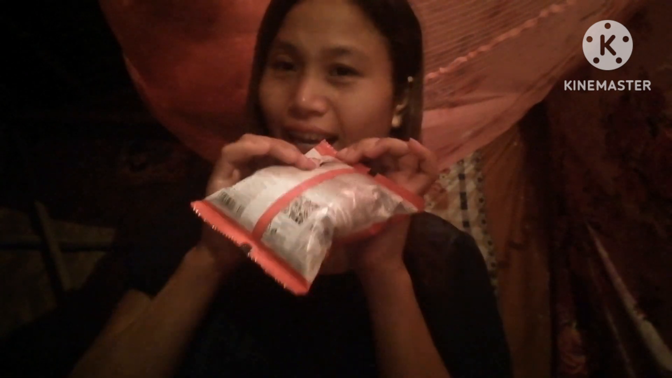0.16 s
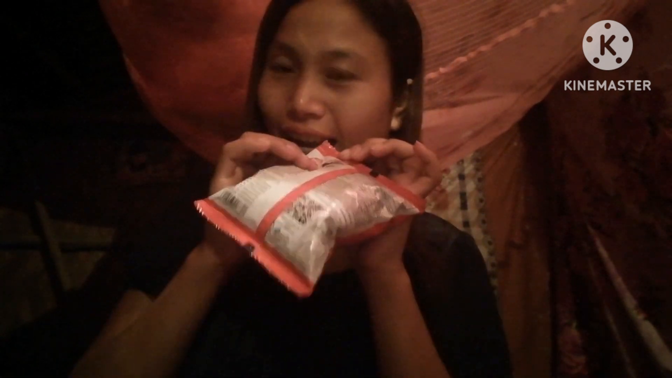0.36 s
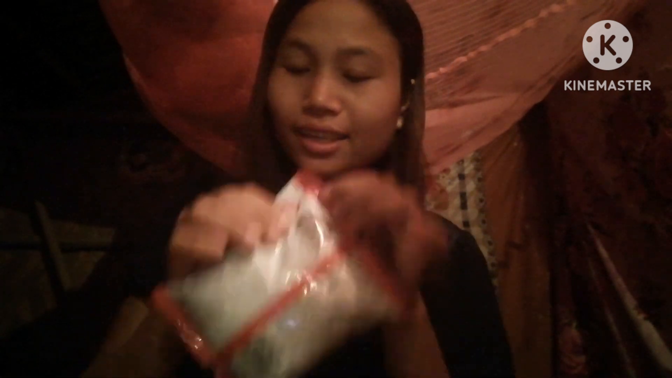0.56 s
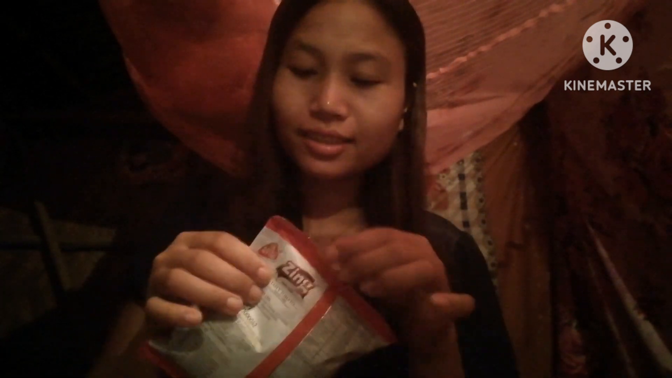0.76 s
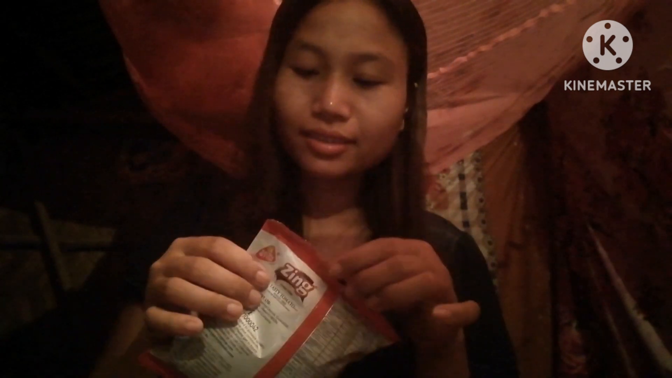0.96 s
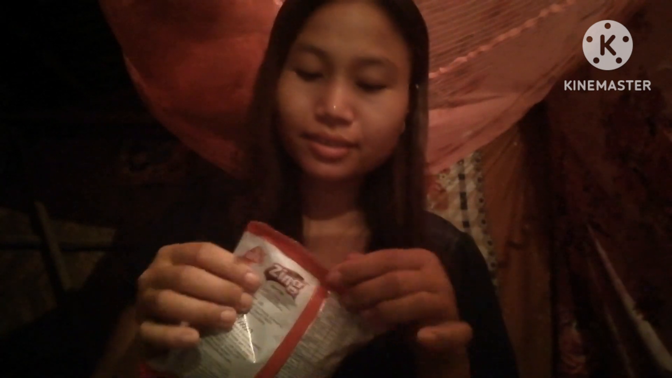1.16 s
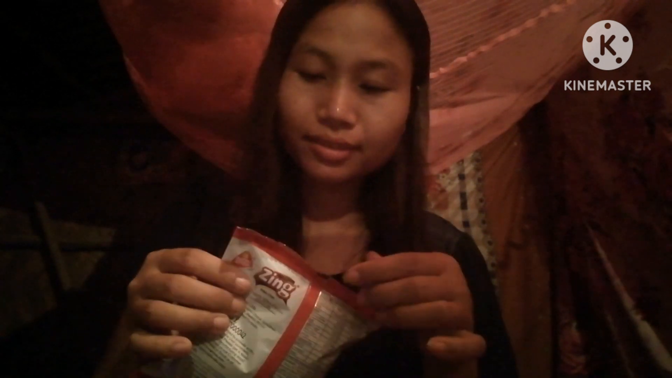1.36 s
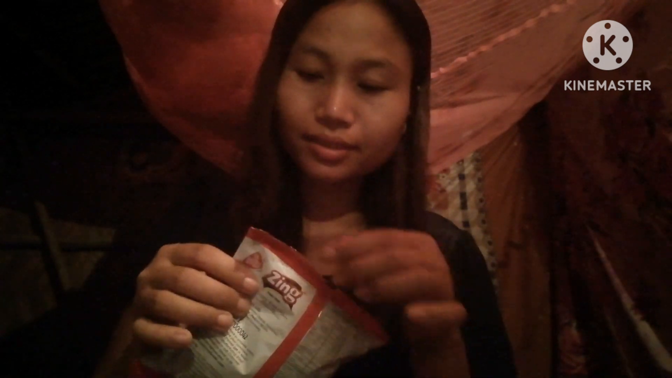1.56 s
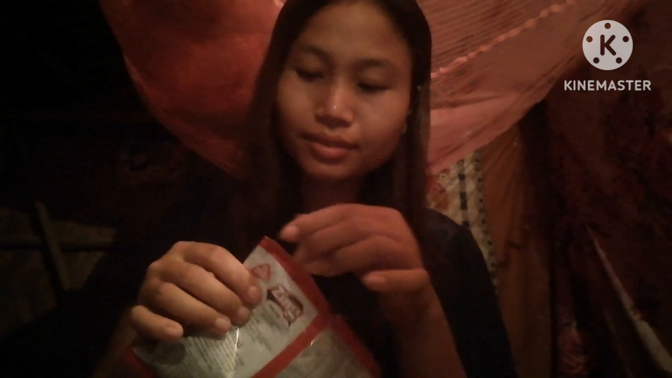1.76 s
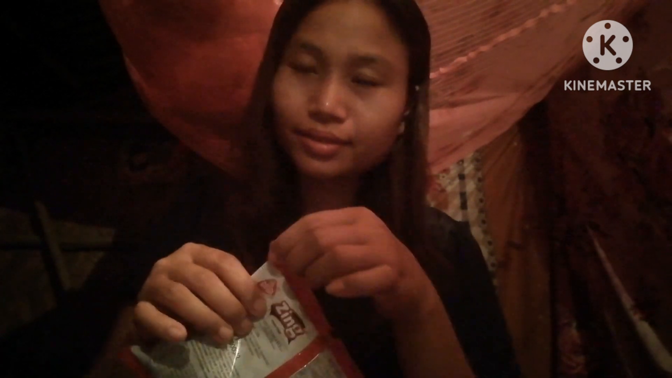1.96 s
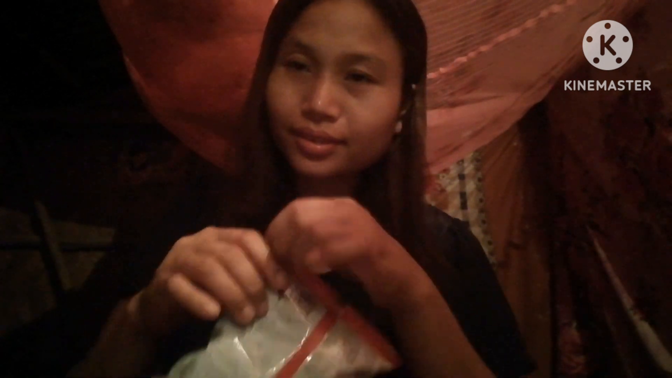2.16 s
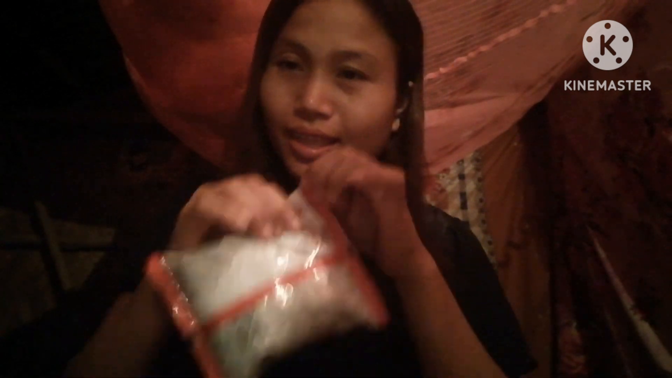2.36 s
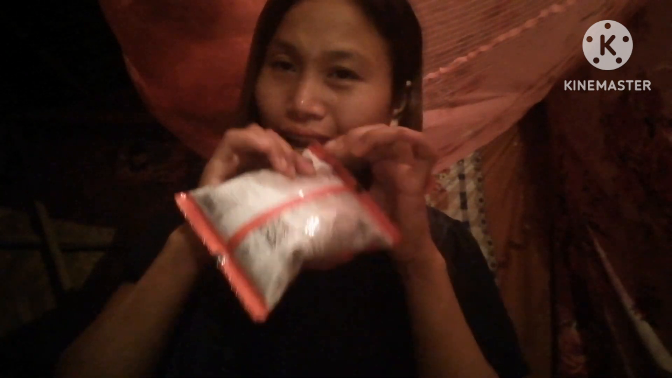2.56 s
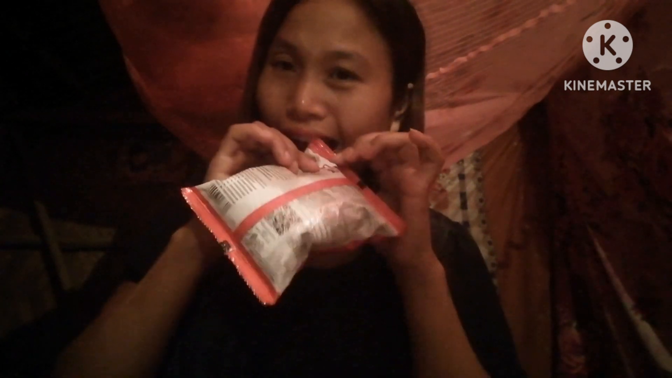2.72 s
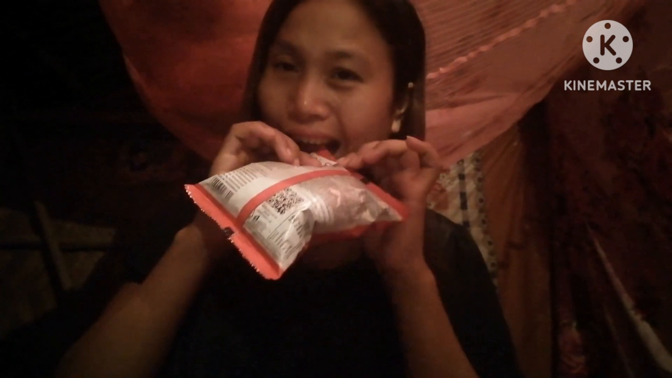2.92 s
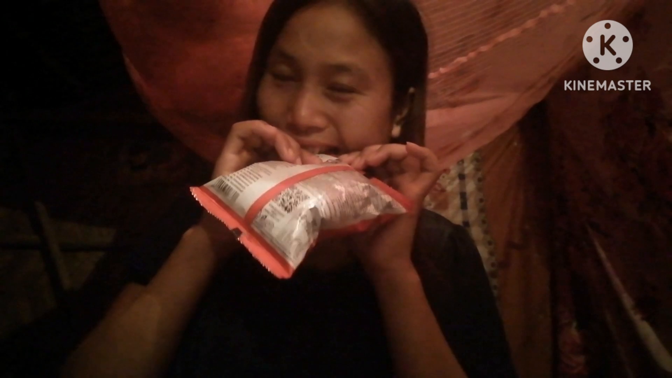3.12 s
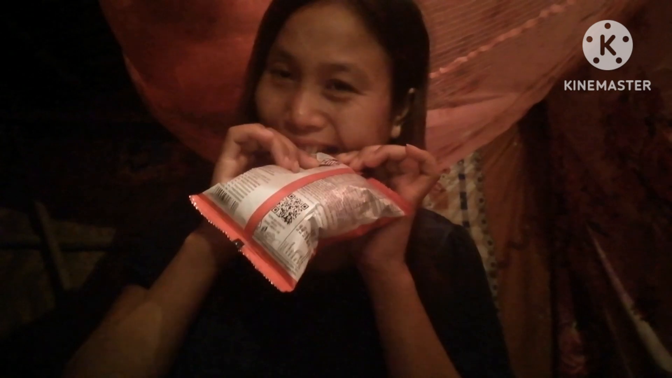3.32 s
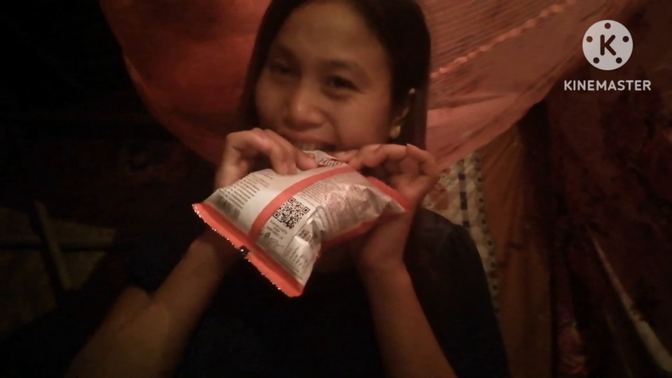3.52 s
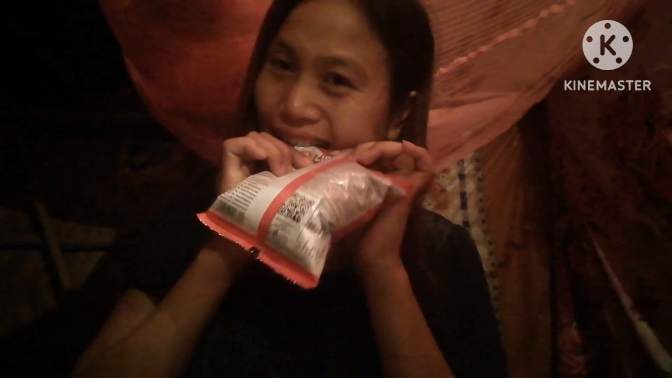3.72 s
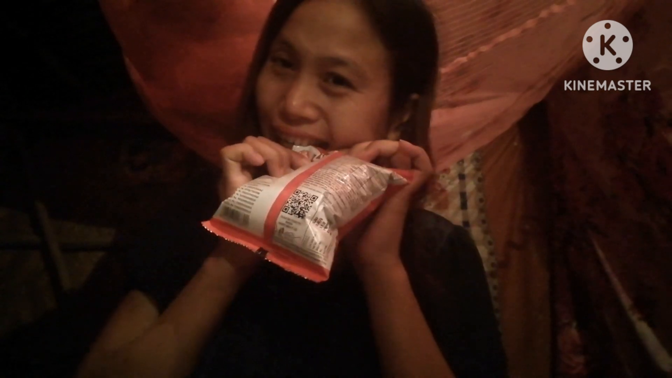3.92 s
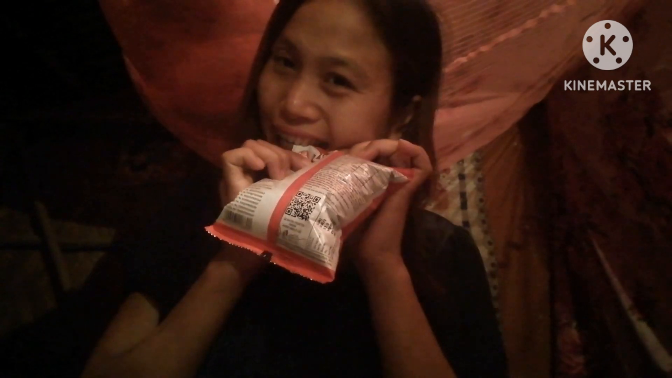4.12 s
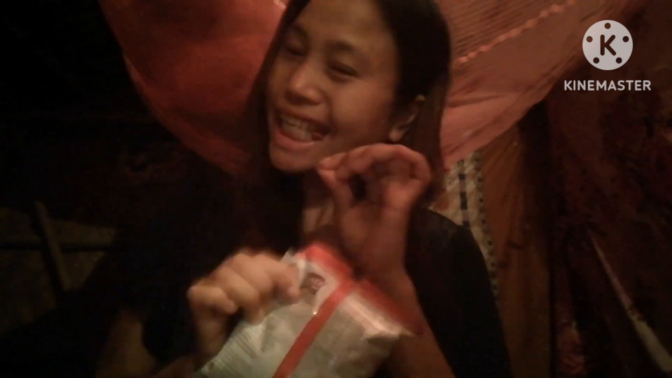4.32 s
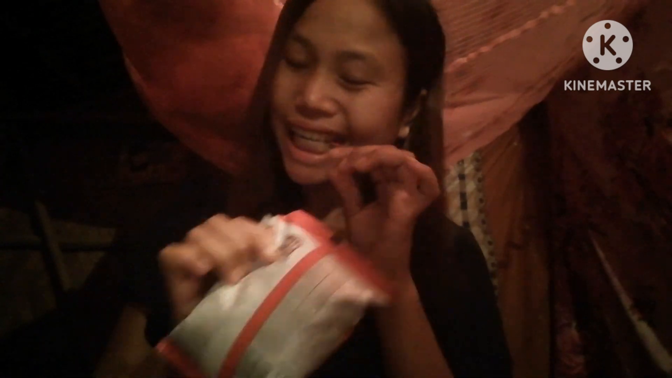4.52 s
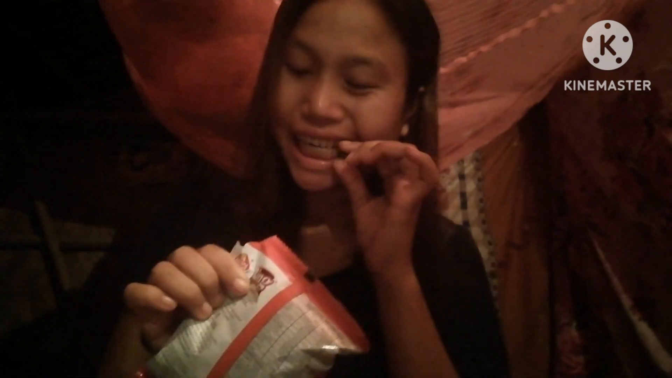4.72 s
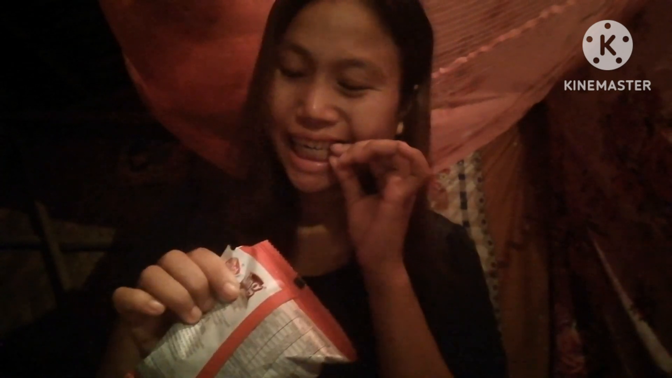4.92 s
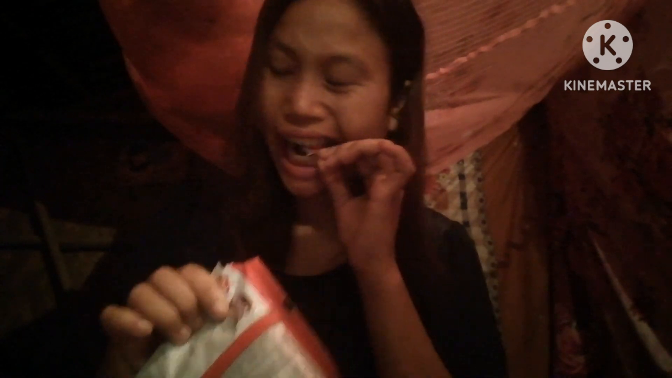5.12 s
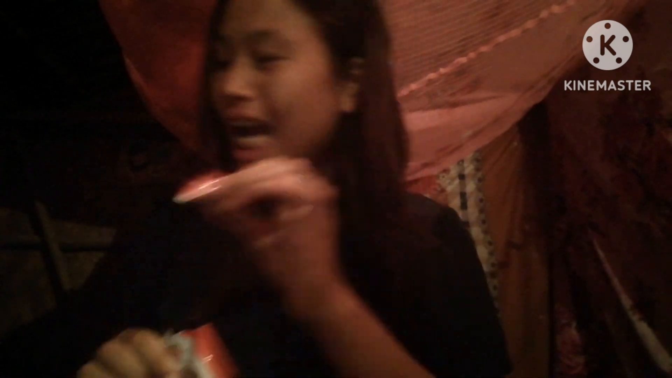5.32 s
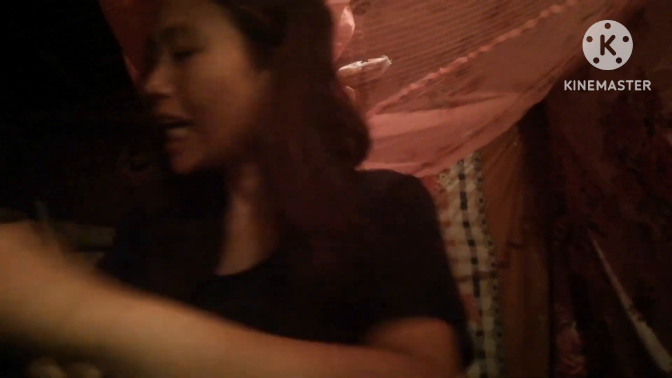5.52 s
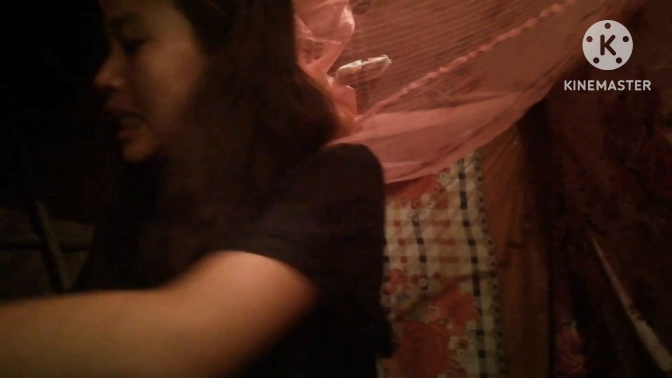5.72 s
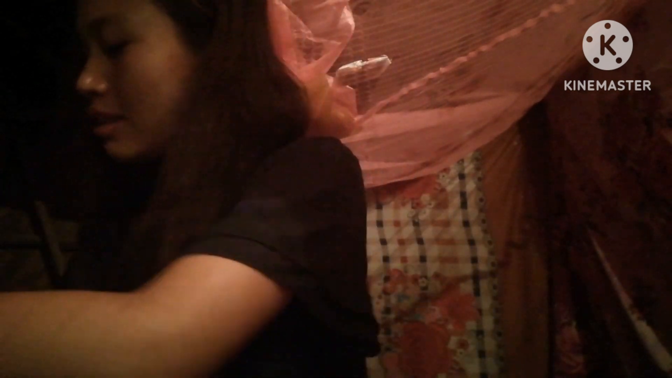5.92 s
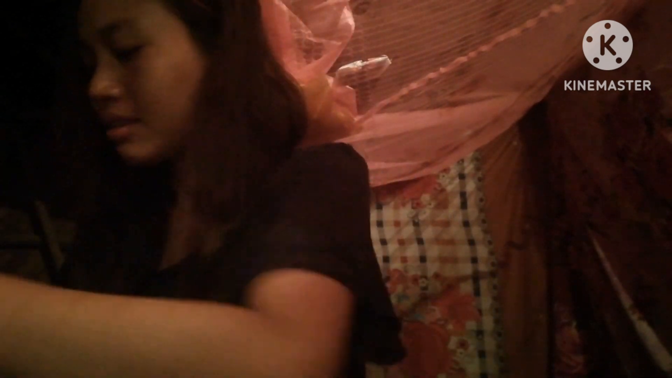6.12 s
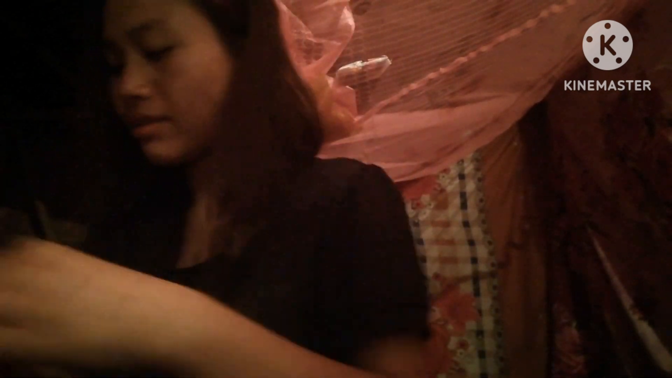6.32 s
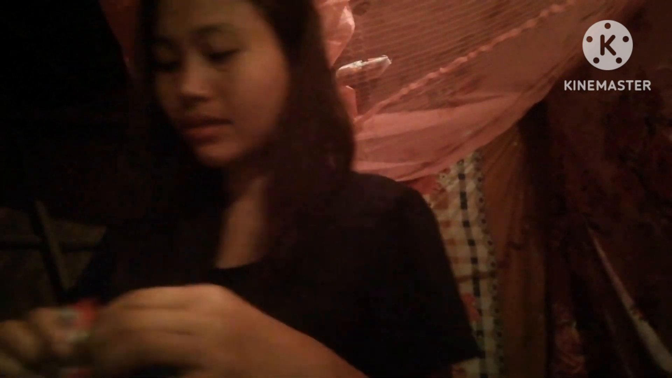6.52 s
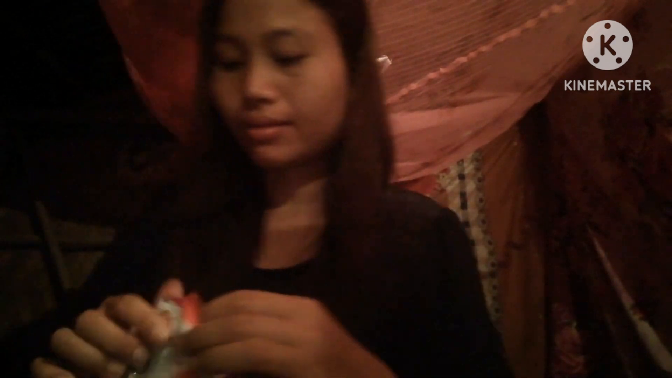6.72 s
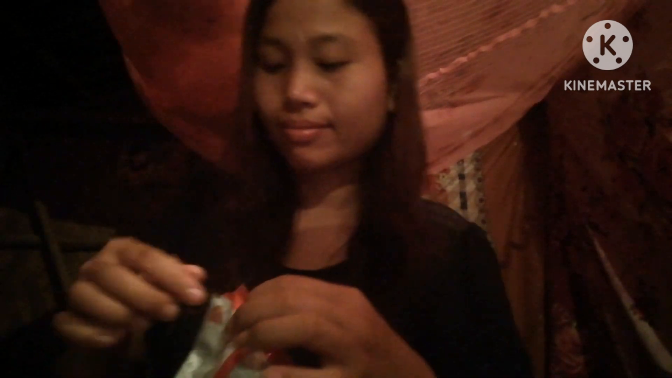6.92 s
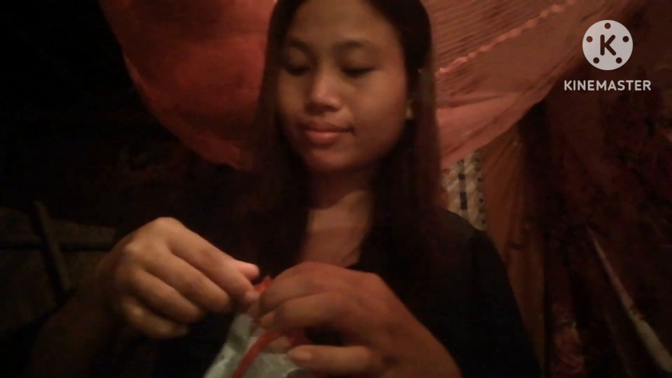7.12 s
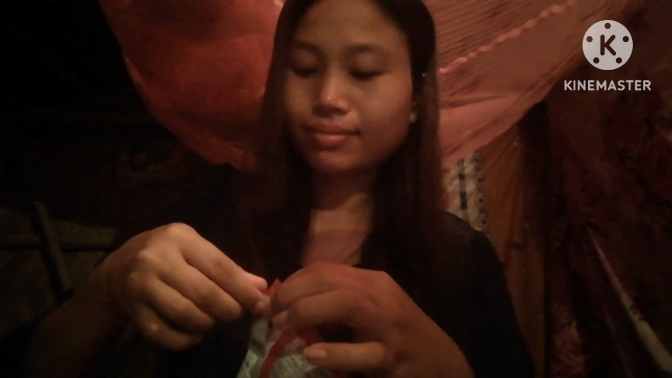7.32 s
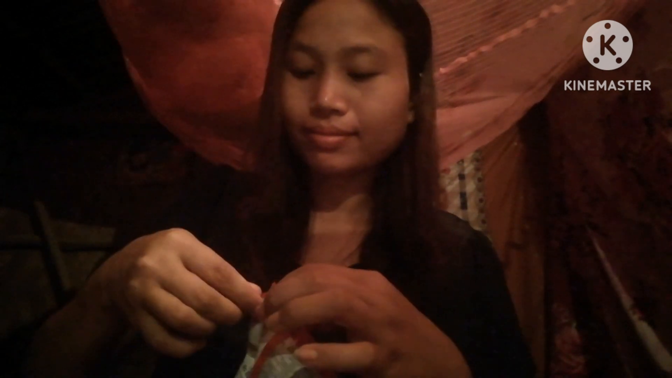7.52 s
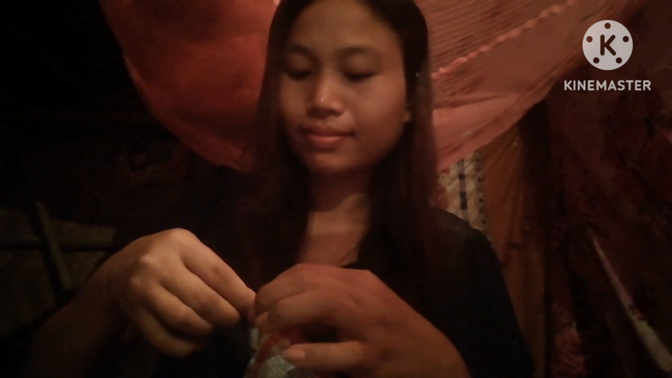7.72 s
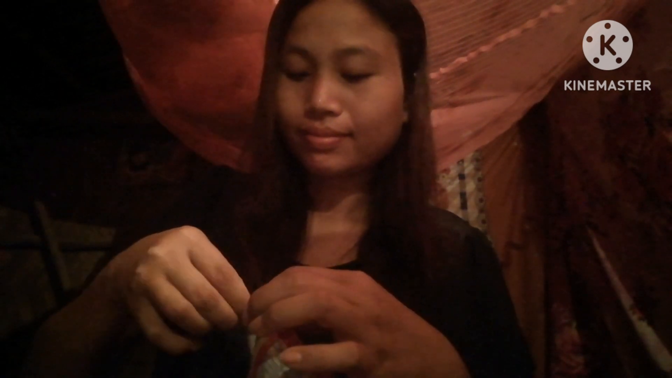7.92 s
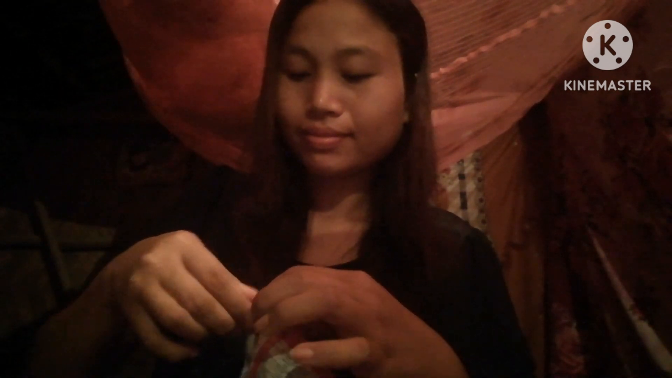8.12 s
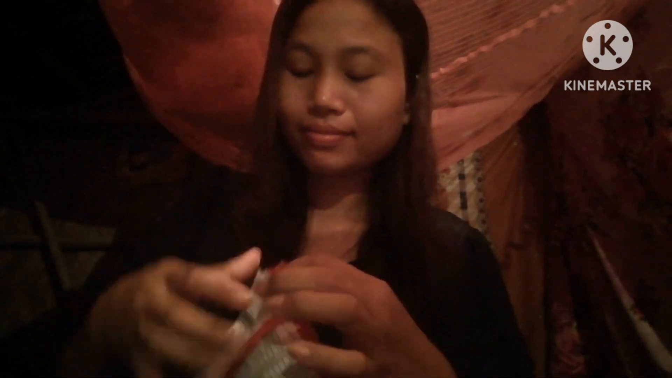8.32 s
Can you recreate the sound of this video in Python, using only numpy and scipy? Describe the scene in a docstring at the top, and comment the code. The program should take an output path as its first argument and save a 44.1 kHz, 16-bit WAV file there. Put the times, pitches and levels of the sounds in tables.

```python
"""At night in a small room an insect, probably a bush cricket, rasps in narrow-band noise over steady hiss.
A foil-lined snack bag is handled: creases snap as ringing noise bursts over a fine crinkle of tiny slips.
From about two seconds teeth and fingers work at the seam, and the snaps crowd together.
At 4.3 seconds it rips: a rush of thousands of slips, which also drums the air in the bag.
Then sparse snaps and slides of the film remain, with a faint wavering drone at seven seconds."""
import sys
import numpy as np
from scipy import signal
from scipy.fft import rfft, irfft, next_fast_len
from scipy.io import wavfile

SR = 44100
rng = np.random.default_rng(int(sys.argv[2]) if len(sys.argv) > 2 else 0)


def dump(signal):
    """Clip the signal to [-1, 1] and save it as 16-bit WAV at the path in sys.argv[1]."""
    limited = np.clip(np.atleast_2d(signal).T, -1, 1)
    pcm = np.round(limited * 32767).astype(np.int16)
    wavfile.write(sys.argv[1], SR, pcm)


N = 369116
TIME = np.arange(N) / SR  # seconds

# Creases snapping. Each row: start in seconds, strength in dB before the voices are weighted,
# panel pitch in Hz, brightness in dB (tilts the balance from panel to sharp edge).
CREASE_SNAPS = [(0.041, -44, 1510, 13), (0.0814, -45, 1410, -8), (0.1272, -39.5, 2440, 7),
                (0.206, -36.5, 2340, -7.5), (0.6668, -51, 1280, -6), (0.724, -30, 1850, -11),
                (0.7482, -37.5, 1670, 4), (0.808, -37.5, 2300, -3), (1.0017, -37, 1150, -3),
                (1.3997, -37.5, 1390, -2.5), (2.1144, -35.5, 1850, -5.5), (2.141, -35.5, 1680, 0),
                (2.163, -32, 1620, 5), (2.1896, -27, 1830, 0), (2.229, -34, 2160, 1),
                (2.2565, -39, 1420, 12), (2.2957, -39, 1300, -1), (2.313, -32, 1110, 1),
                (2.329, -25.5, 2420, 6.5), (2.3771, -34, 1370, -4.5), (2.4179, -36.5, 1420, -6),
                (2.4324, -36, 1580, 1), (2.5911, -42.5, 1320, -12.5), (2.6133, -39.5, 1300, -1.5),
                (2.7018, -41, 1970, -3.5), (2.7522, -31.5, 1190, -1), (2.8302, -36.5, 1290, -3),
                (2.8744, -35, 1660, 4), (2.902, -36, 1850, -9), (2.9131, -32, 2210, 1.5),
                (2.93, -36.5, 1660, 0), (3.047, -44, 1770, 7), (3.0858, -37.5, 1630, -2),
                (3.1454, -37, 1450, -3), (3.1684, -32.5, 1710, 4), (3.1828, -39, 2000, 14.5),
                (3.2474, -30, 1660, -1.5), (3.275, -38, 1660, 6), (3.303, -32.5, 1560, -0.5),
                (3.3142, -41.5, 1430, 18.5), (3.3235, -33.5, 1780, -3), (3.3598, -37.5, 1820, 3.5),
                (3.455, -33.5, 1460, -4.5), (3.5773, -29.5, 1590, -5), (3.601, -33, 1610, 2),
                (3.619, -27.5, 1710, 1), (3.6442, -23.5, 1670, -3.5), (3.7108, -40, 1740, 30),
                (3.7296, -35, 1540, -2), (3.7424, -32.5, 1620, -1), (3.7839, -27.0, 1270, 3),
                (3.823, -29.5, 1420, -2), (3.8401, -33, 1060, -1), (3.8843, -28, 1680, 1.5),
                (3.9216, -26, 2050, -6), (3.9391, -37.5, 930, -15.5), (3.962, -24.5, 1460, -2),
                (3.9998, -31.5, 2140, 4), (4.0237, -22, 1570, 6), (4.1806, -38.5, 2210, -6.5),
                (4.2912, -36, 2070, 0), (4.3217, -24.0, 890, 7), (4.337, -23.0, 1240, -3.5),
                (4.351, -27, 1260, 3), (4.376, -24.5, 1570, 4.5), (5.0642, -42.5, 1830, 0.5),
                (5.1342, -42.5, 2000, -7.5), (5.3446, -44, 1500, -1.5), (5.5216, -50, 1460, -1),
                (6.0661, -43, 1140, -2.5), (6.435, -58.5, 1160, -14), (6.7266, -45, 1570, 11.5),
                (6.755, -37, 1270, -4.5), (7.0726, -45.5, 1060, 6.5), (7.1776, -52, 1620, 1),
                (7.4646, -48, 1300, -5), (7.5036, -41, 1140, -1), (7.6857, -50, 1950, 6),
                (8.3293, -33, 1050, -10)]
# Tone colour of the crinkling film. Each row: frequency in Hz, relative level in dB.
CRINKLE_COLOUR = [(100, -11), (600, -0.5), (1500, 2), (3000, -8), (6300, -5), (15000, -29.5)]


def from_db(db):
    """Decibels to gain."""
    return 10 ** (np.asarray(db) / 20)


def rms_one(x):
    """Scale to unit power."""
    return x / np.sqrt(np.mean(x ** 2) + 1e-20)


def gain_curve(rows):
    """Gain over time from rows of (seconds, dB), silent outside them."""
    rows = np.array(rows)
    return from_db(np.interp(TIME, rows[:, 0], rows[:, 1], left=-200, right=-200))


def swell(start_s, length_s, attack_s, release_s):
    """Rise, hold, fall; attack and release are the times for 20 dB."""
    before = np.maximum(start_s - TIME, 0) / attack_s
    after = np.maximum(TIME - start_s - length_s, 0) / release_s
    return from_db(-20 * (before + after).clip(0, 10))


def gestures(rows, attack_s, release_s):
    """Gain over time of a series of hand movements that share one shape."""
    return sum(from_db(db) * swell(s, length, attack_s, release_s) for s, length, db in rows)


def band(x, edges_hz, kind, order=2):
    """Causal Butterworth filter."""
    edges_hz = np.clip(edges_hz, 10, .45 * SR)
    return signal.sosfilt(signal.butter(order, edges_hz, kind, fs=SR, output="sos"), x)


def colour(x, points):
    """Minimum-phase filter of unit power through (Hz, dB) points: nothing sounds early."""
    size = 2 * next_fast_len(N // 2 + SR // 4)
    hz, db = np.transpose(points)
    grid = np.maximum(np.fft.rfftfreq(size, 1 / SR), 1)
    magnitude = rms_one(from_db(np.interp(np.log(grid), np.log(hz), db)))
    # folding the cepstrum onto positive times makes the phase minimal
    cepstrum = irfft(np.log(magnitude))
    cepstrum[1:size // 2] *= 2
    cepstrum[size // 2 + 1:] = 0
    response = np.exp(rfft(cepstrum))
    return irfft(rfft(x, size) * response)[..., :N]


def resonate(x, peaks):
    """Lift each (Hz, width in Hz, dB) resonance in turn."""
    for hz, width, db in peaks:
        x = x + (from_db(db) - 1) * signal.lfilter(*signal.iirpeak(hz, hz / width, fs=SR), x)
    return x


def two_ports(pair, apart_hz):
    """Long waves reach both ports alike, short ones differ."""
    side = band(pair[1], apart_hz, "high", order=1)
    return np.array([pair[0] + side, pair[0] - side])


def slips(per_s, spread_db, ring_s):
    """Tiny slips of the film at random moments, mostly weak, each with a brief flutter."""
    draws = rng.random((int(per_s * N / SR), 2))
    moments = (draws[:, 0] * N).astype(int)
    sizes_db = spread_db * np.minimum(-np.log(1 - draws[:, 1]), 3)
    energy = np.full(N, 1e-18)
    energy[moments] = from_db(sizes_db) ** 2
    power = signal.lfilter([1], [1, -np.exp(-2 / (ring_s * SR))], energy)
    return np.sqrt(power) * rng.standard_normal((2, N), dtype=np.float32)


def wrinkles(per_s, spread_db, ring_s, apart_hz, pitch_q=1.64, count=6):
    """Wrinkles of several sizes: the slips of each size sound around a pitch of their own."""
    grains = 0
    for hz in np.geomspace(350, 13000, count):
        one_size = slips(per_s / count, spread_db, ring_s)
        grains = grains + signal.lfilter(*signal.iirpeak(hz, pitch_q, fs=SR), one_size)
    return rms_one(two_ports(grains, apart_hz))


def background(level_db=-62.5):
    """Steady hiss with a few resonances, and a low rumble that comes and goes."""
    # Tone colour of the hiss. Each row: frequency in Hz, relative level in dB.
    hiss_colour = [(30, 7.5), (65, 3), (150, -0.5), (300, -6), (550, -11.5), (5000, -20), (8200, -25),
                   (10500, -15), (12000, -24.5)]
    # Resonances in the hiss. Each row: frequency in Hz, width in Hz, lift in dB.
    hiss_peaks = [(1610, 214, 12.5), (3150, 173, 15), (9800, 300, 12.5)]
    # Course of the rumble. Each row: time in seconds, level in dB.
    rumble_course = [(0, -70), (1, -56), (1.8, -64.5), (4.2, -72), (5, -80)]
    noise = two_ports(rng.standard_normal((2, N)), apart_hz=2140)
    hiss = resonate(colour(noise, hiss_colour), hiss_peaks)
    rumble = rms_one(band(rng.standard_normal(N), [33, 43], "band"))
    return from_db(level_db) * rms_one(hiss) + gain_curve(rumble_course) * rumble


def cricket(level_db=-52.0, trough_db=-19, sharpness=1.07, echo_s=.011, echo_db=-6):
    """Each wing stroke swells a narrow rasp; a wall echo combs it, and the room fills the gaps."""
    # Tone colour of the rasp. Each row: frequency in Hz, relative level in dB.
    rasp_colour = [(4800, -29), (6200, -18.5), (6420, -6.5), (6720, -5.5), (6900, -6), (7050, -4.5),
                   (7250, -22.5), (7800, -61)]
    # The cricket falls behind its beat. Each row: time in seconds, lag in chirps.
    beat_lag = [(0, .11), (4.2, .06), (5.6, .23), (8.3, .22)]
    chirps_per_s = 9.33
    beat = chirps_per_s * TIME - np.interp(TIME, *np.transpose(beat_lag))
    stroke = np.abs(np.cos(np.pi * beat)) ** (2 * sharpness)
    rasp = colour(rng.standard_normal((2, N)), rasp_colour)
    echo = from_db(echo_db) * np.roll(rasp, round(echo_s * SR), axis=1)
    return from_db(level_db) * (stroke + from_db(trough_db)) * rms_one(rasp + echo)


def settling(level_db=-13, decay_s=0.018):
    """Every snap leaves a strain, set in dB against its strength, that dies away in the film around it."""
    kicks = np.full(N, 1e-18)
    for s, db, *_ in CREASE_SNAPS:
        kicks[round(s * SR)] += from_db(db + level_db)
    return signal.lfilter([1], [1, -np.exp(-1 / (decay_s * SR))], kicks)


def crinkle(resting_db=-68):
    """Small wrinkles give way under the fingers; sparse faint ticks of the held bag go on throughout."""
    # Pulls at the seam that crinkle the film. Each row: start in seconds, length in seconds, level in dB.
    pulls = [(2.16, 0.021, -49.5), (2.32, 0.089, -41), (2.8, 0.11, -57.5), (3.2, 0.095, -53),
             (3.61, 0.033, -44.5), (3.82, 0.15, -43.5)]
    pried = wrinkles(per_s=330, spread_db=5.0, ring_s=0.0016, apart_hz=4200)
    pried = rms_one(colour(pried, CRINKLE_COLOUR))
    held = rms_one(colour(slips(per_s=10, spread_db=2.5, ring_s=.002), CRINKLE_COLOUR))
    effort = gestures(pulls, attack_s=0.14, release_s=0.16) + settling()
    return effort * pried + from_db(resting_db) * held


def rustle():
    """Film sliding through the hands sheds a dense stream of scratchy grains."""
    # Slides of the film. Each row: start in seconds, length in seconds, level in dB.
    slides = [(0, 0.096, -45), (2.09, 0.14, -54), (4.62, 0.066, -50.5), (5.96, 0.075, -54),
              (6.05, 0.011, -48.5), (6.74, 0.069, -45), (7.46, 0.06, -57), (8.15, 0.034, -53)]
    # Tone colour of the grains. Each row: frequency in Hz, relative level in dB.
    rustle_colour = [(70, 10), (220, 1), (1000, 2.5), (2200, -3), (5500, -4), (15000, -22)]
    grains = wrinkles(per_s=900, spread_db=6.0, ring_s=0.0037, apart_hz=2770)
    grains = rms_one(colour(grains, rustle_colour))
    return gestures(slides, attack_s=0.065, release_s=0.07) * grains


def snaps(crack_s=0.00061, flutter_s=0.0045, flutter_db=-20, rise_s=0.00007,
          second_s=0.001008, second_db=-5, panel_q=2.8, low_hz=480, crack_hz=2300,
          edge_hz=5000, top_hz=7000, level_db=-2, side_share=0.75):
    """A crease flips in two quick steps; each cracks and sets the panel around it ringing."""
    # Voices of a snap, in the order panel, crack, sharp edge.
    # Each row: level over the snap's strength in dB, change in dB per dB of brightness.
    voices = [(-2, -0.87), (4.5, 0.3), (0, 0.59)]
    t = np.arange(SR // 40) / SR
    window = SR // 200  # five milliseconds
    decay = np.exp(-t / crack_s) + from_db(flutter_db) * np.exp(-t / flutter_s)
    step = decay * (1 - np.exp(-t / rise_s))
    delays = second_s * rng.gamma(2, .5, len(CREASE_SNAPS))  # second_s is their mean
    noise = rng.standard_normal((len(CREASE_SNAPS), 2, len(t)))
    out = np.zeros((2, N + len(t)))
    for (s, strength_db, panel_hz, bright_db), burst, delay in zip(CREASE_SNAPS, noise, delays):
        envelope = step + from_db(second_db) * np.interp(t - delay, t, step)
        burst = two_ports(burst * envelope * [[1], [side_share]], apart_hz=3170)
        body = band(burst, [low_hz, crack_hz], "band")
        panel = signal.lfilter(*signal.iirpeak(panel_hz, panel_q, fs=SR), body)
        crack = band(burst, [crack_hz, edge_hz], "band", order=3)
        edge = band(band(burst, edge_hz, "high", order=4), top_hz, "low")
        levels = [strength_db + db + slope * bright_db for db, slope in voices]
        snap = sum(from_db(db + level_db) * rms_one(part) for db, part in zip(levels, (panel, crack, edge)))
        start = max(round(s * SR), 0)
        # a level states the burst's whole energy as if spread over the window
        out[:, start:start + len(t)] += snap * np.sqrt(window / len(t))
    return out[:, :N]


def drummed(film, level_db=-1, bag_hz=200, bag_q=0.77, soft_hz=400):
    """The film shakes the cushion of air inside the bag, which answers with a dull pat."""
    pat = signal.lfilter(*signal.iirpeak(bag_hz, bag_q, fs=SR), film.mean(axis=0))
    return from_db(level_db) * band(pat, soft_hz, "low")


def bumps(fade_s=0.011):
    """Soft contacts of the hands give only a short low thud."""
    # Dull bumps of the hands. Each row: time in seconds, level in dB before the last softening.
    contacts = [(0.511, -51), (2.335, -47), (3.249, -48), (3.925, -49), (3.962, -52), (6.8, -51)]
    envelope = sum(from_db(db) * (TIME > s) * np.exp(-np.abs(TIME - s) / fade_s) for s, db in contacts)
    thud = rms_one(band(rng.standard_normal(N), [55, 160], "band"))
    return band(envelope * thud, 260, "low")


def ticks(per_s=24, level_db=-54.5):
    """While the seam is worked at, lesser creases give way at random between the loud snaps."""
    lone = two_ports(slips(per_s, spread_db=2.5, ring_s=0.0012), apart_hz=3200)
    lone = rms_one(colour(lone, CRINKLE_COLOUR))
    work = swell(start_s=2.2, length_s=1.85, attack_s=.08, release_s=.08)
    return from_db(level_db) * work * rms_one(band(lone, 1120, "high"))


def rip():
    """The seam pops, the tear runs in thousands of slips, spurts and flutters out, shaking the bag's air."""
    # Tone colour of the tearing film. Each row: frequency in Hz, relative level in dB.
    film_colour = [(200, -4.5), (1400, 3.5), (3000, 0.5), (4300, -6.5), (6300, -2), (9000, -16.5),
                   (15000, -20)]
    # Tone colour of the air in the bag. Each row: frequency in Hz, relative level in dB.
    air_colour = [(30, -31), (70, -10), (130, 6.5), (400, 1.5), (800, -16)]
    start_s, length_s = 4.321, 0.13
    grip_s, release_s = 0.016, 0.028  # time to take hold, time to fall 20 dB
    running_db, air_db = -29.5, -40.5  # running tear: film, air
    surge_db, air_surge_db, surge_s = -25.5, -30, 0.013  # last spurt: film, air, build-up
    flutter_db, flutter_length_s = -46.5, 0.23  # loose film, counted from the pop
    pop_db, pop_s = -27.5, 0.033  # air let out as the seam gives: level, decay

    film = colour(two_ports(slips(per_s=7800, spread_db=5.5, ring_s=0.00073), apart_hz=4000), film_colour)
    air = colour(two_ports(slips(per_s=500, spread_db=5.5, ring_s=0.00033), apart_hz=1500), air_colour)
    age = np.maximum(TIME - start_s, 0)
    running = (age > 0) * swell(start_s, length_s, grip_s, release_s)
    surge = running * np.exp(np.minimum(age - length_s, 0) / surge_s)
    flutter = (age > 0) * swell(start_s, flutter_length_s, grip_s, release_s)

    film_gain = from_db(running_db) * running * (1 - np.exp(-age / grip_s))
    film_gain = film_gain + from_db(surge_db) * surge + from_db(flutter_db) * flutter
    air_gain = running * (from_db(air_db) + from_db(pop_db) * np.exp(-age / pop_s))
    air_gain = air_gain + from_db(air_surge_db) * surge
    return film_gain * rms_one(film) + air_gain * rms_one(air)


def drone(level_db=-66.5, fade_s=0.13):
    """A faint low sine tone comes up, wavers and fades."""
    # Wavering pitch. Each row: time in seconds, frequency in Hz.
    pitch = [(6.9, 154.5), (7.068, 151), (7.104, 162.5), (7.424, 140.5), (7.5, 125)]
    phase = 2 * np.pi * np.cumsum(np.interp(TIME, *np.transpose(pitch))) / SR
    loudness = swell(start_s=6.95, length_s=0.445, attack_s=fade_s, release_s=fade_s)
    return from_db(level_db) * loudness * np.sin(phase)


def room(x, t60=0.15, wet_db=-10, wall_hz=7500):
    """Scattered reflections from near walls and cloth die away quickly."""
    t = np.arange(SR // 2) / SR
    echoes = two_ports(rng.standard_normal((2, len(t))), apart_hz=1400)
    echoes = echoes * from_db(-60 * t / t60) * (t > .003)  # the first reflection needs 3 ms
    echoes /= np.sqrt(np.sum(echoes ** 2, axis=1, keepdims=True))
    echoes = band(echoes, wall_hz, "low", order=1)
    return x + from_db(wet_db) * signal.fftconvolve(x, echoes, axes=1)[:, :N]


def port_resonances(pair):
    """Each microphone port rings at pitches of its own, lifting them in the bag's sound."""
    # Resonances of the two ports. Each row: frequency in Hz, width in Hz, lift in dB.
    left_port = [(1850, 600, 3), (8150, 800, 7)]
    right_port = [(5900, 1800, 3), (14700, 900, 6)]
    left, right = pair
    return np.array([resonate(left, left_port), resonate(right, right_port)])


def scene():
    """The bag close to the two microphone ports, the night behind it."""
    # The bag swings aside and back. Each row: time in seconds, left over right in dB.
    bearing = [(5.5, 0), (6.05, 6), (7.2, 1)]
    pan_db = np.interp(TIME, *np.transpose(bearing))
    crackle = snaps() + crinkle() + ticks()
    film = crackle + drummed(crackle) + rustle() + rip()
    bag = port_resonances(room(film * from_db([pan_db / 2, -pan_db / 2])))
    return bag + bumps() + cricket() + background() + drone()


def record(dry, cutoff_hz=15800):
    """A steep elliptic low-pass cuts off the top."""
    return signal.sosfilt(signal.ellip(10, .1, 70, cutoff_hz, fs=SR, output="sos"), dry)


dry = scene()
out = record(dry)
dump(out)
```